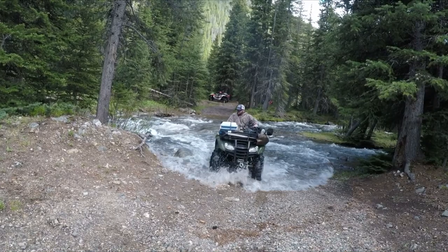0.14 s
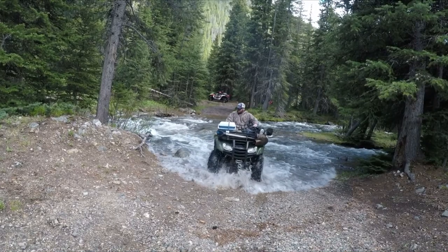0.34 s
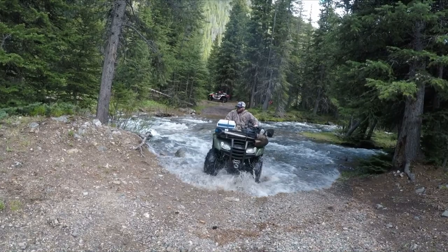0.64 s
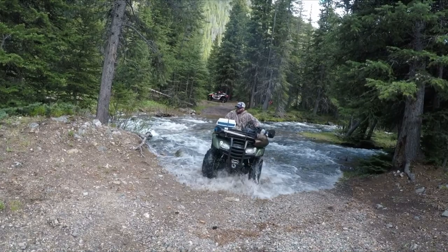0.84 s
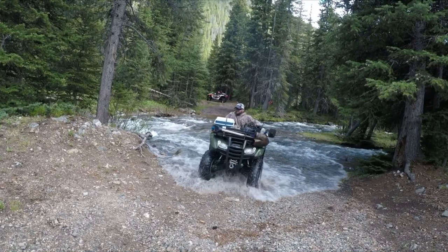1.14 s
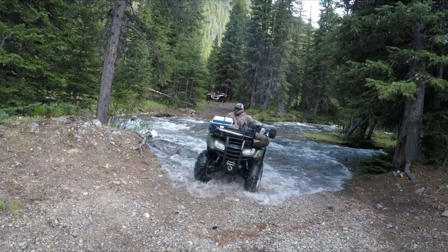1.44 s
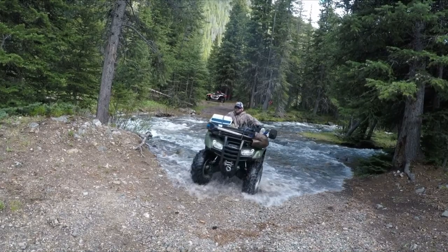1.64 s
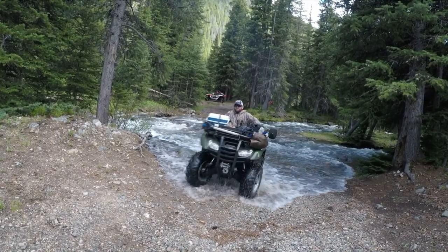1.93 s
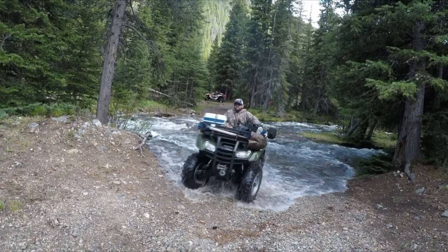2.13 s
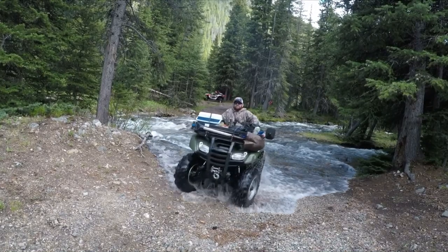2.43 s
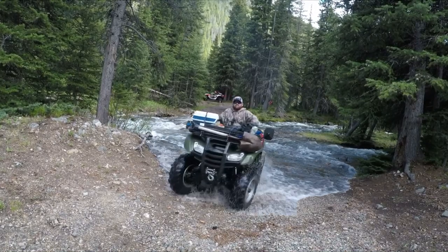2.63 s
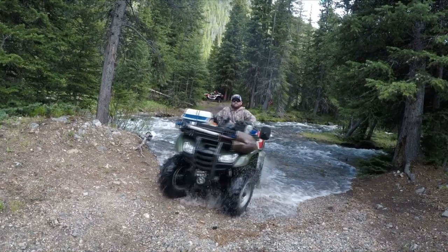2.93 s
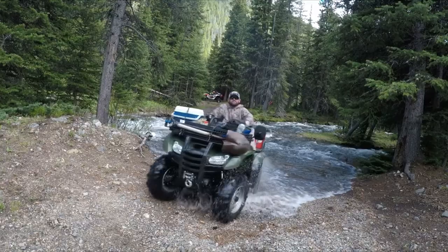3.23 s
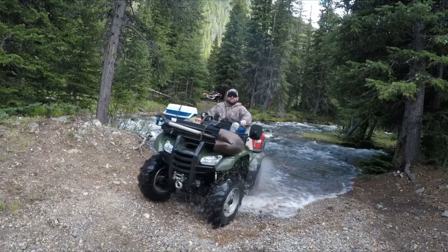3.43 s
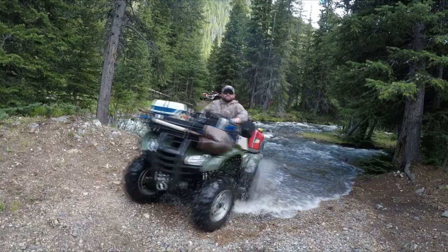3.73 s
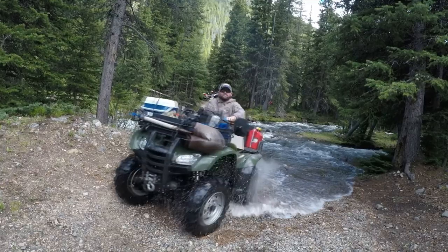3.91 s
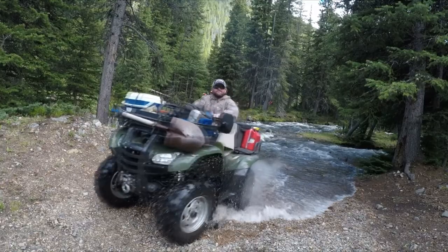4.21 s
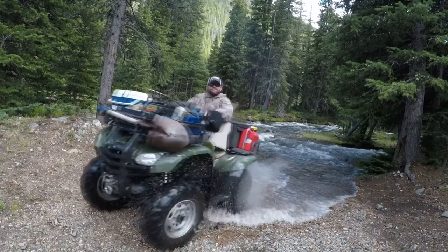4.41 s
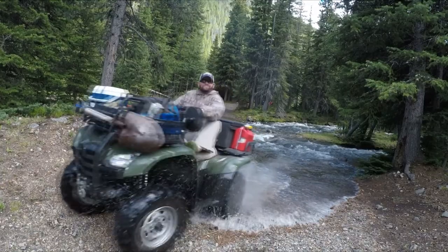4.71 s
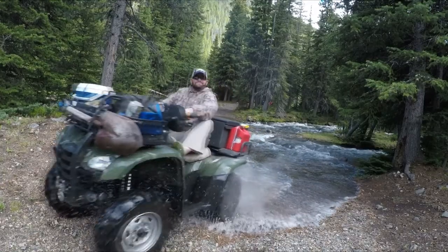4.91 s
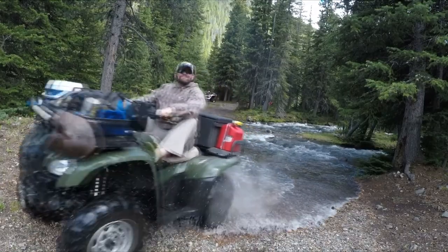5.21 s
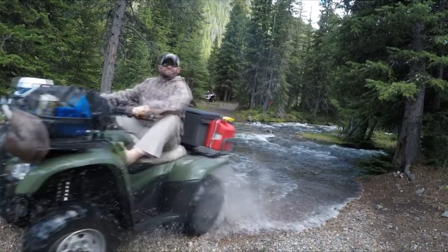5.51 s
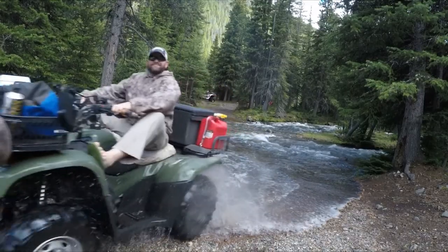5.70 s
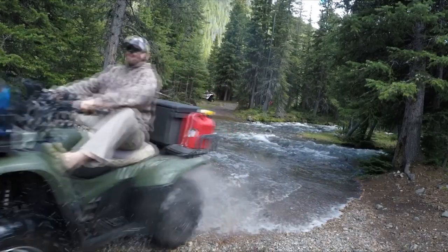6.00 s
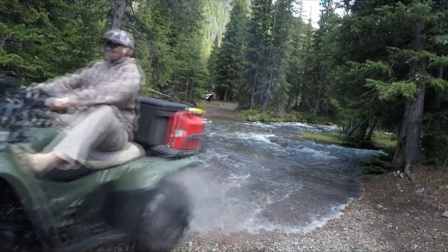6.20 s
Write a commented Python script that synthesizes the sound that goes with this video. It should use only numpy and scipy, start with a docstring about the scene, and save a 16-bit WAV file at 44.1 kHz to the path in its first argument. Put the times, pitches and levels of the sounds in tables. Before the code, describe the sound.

A creek rushes outdoors with a muffled roar and small ringing drops, while a slowed quad bike engine beats in deep, even thumps. Plops, swells of sloshing water and faint pebble clicks come and go as it climbs the bank toward the microphone. In the last seconds the engine's pulsing clatter gets louder and one firing cracks sharply as it passes close. A thin glassy fizz and light ticks run throughout.

```python
"""A single-cylinder quad bike crawls out of a rushing creek and passes close by, at quarter speed.
Its engine throbs deeply, with one falling thump per firing and a clatter that grows as it nears.
The creek is a dull roar with ringing drops; the wheels slosh, splash and click stones together.
The slow-motion playback adds a faint glassy fizz and fine ticks."""
import sys
import numpy as np
from scipy import signal
from scipy.fft import rfft, irfft
from scipy.io import wavfile
from scipy.ndimage import map_coordinates

SR = 44100
rng = np.random.default_rng(int(sys.argv[2]) if len(sys.argv) > 2 else 0)


def waveform_to_disk(signal):
    """Save audio, clipped to [-1, 1], as 16-bit WAV at the path in sys.argv[1]."""
    frames = np.transpose(np.atleast_2d(signal))
    scaled = np.clip(frames, -1, 1) * 32767
    samples = np.round(scaled).astype(np.int16)
    wavfile.write(sys.argv[1], SR, samples)


N = 280035
TIME_S = np.arange(N) / SR


def from_db(db):
    """Turn decibels into a number to multiply by."""
    return 10 ** (np.asarray(db) / 20)


def rms_one(x):
    """Scale a signal so its average level (rms) is 1."""
    return x / np.sqrt(np.mean(x ** 2) + 1e-20)


def in_time(rows):
    """Join (time, value) rows into a curve with a value at every sample."""
    return np.interp(TIME_S, *np.transpose(rows))


def at_hz(rows):
    """Join rows into curves over frequency, one per value column."""
    hz, *columns = np.transpose(rows)
    bins = np.maximum(np.arange(N // 2 + 1) * SR / N, 1)
    return [np.interp(np.log(bins), np.log(hz), column) for column in columns]


def ring(clicks, hz, ring_s):
    """Each click starts a tone that fades by 60 dB in ring_s."""
    r, w = from_db(-60 / (ring_s * SR)), 2 * np.pi * hz / SR
    return signal.lfilter([0, np.sin(w)], [1, -2 * r * np.cos(w), r * r], clicks + 1e-18)


def resonance(x, hz, width_hz):
    """Let through a band of sound around one pitch."""
    r, w = np.exp(-np.pi * width_hz / SR), 2 * np.pi * hz / SR
    return signal.lfilter(np.array([1, 0, -1]) * (1 - r * r) / 2, [1, -2 * r * np.cos(w), r * r], x)


def low_pass(x, hz, order=4):
    """Soften everything above hz."""
    return signal.sosfilt(signal.butter(order, hz, fs=SR, output="sos"), x + 1e-18)


def clicks_of(rows):
    """One click per (start_s, level_db) row."""
    clicks = np.zeros(N)
    for start_s, level_db in rows:
        clicks[round(start_s * SR)] = from_db(level_db)
    return clicks


def random_clicks(per_s, size_db):
    """Clicks at random moments, mostly small and a few large."""
    sizes = from_db(size_db * np.minimum(rng.exponential(1, N), 3)) * rng.choice([-1, 1], N)
    return sizes * (rng.random(N) < per_s / SR)


# How noise spreads between the ears: pitch_hz, likeness (1 = same in both), left_minus_right_db
STEREO_SPREAD = [(30, 0.59, 3.5), (90, .45, 3.5), (134, 0.67, 2.5), (224, 0.29, 0), (268, 0.38, -5),
                 (455, 0.57, 0), (1030, 0.92, 0.1), (1270, 0.72, 3.5), (1710, 0.37, 0), (2100, -0.16, -6.5),
                 (3100, 0.19, 0.5)]

def stereo_noise(spectrum):
    """Noise shaped by a spectrum, wide at some pitches and narrow at others."""
    likeness, lean_db = at_hz(STEREO_SPREAD)
    middle, side = rfft(rng.standard_normal((2, N)))
    sign = np.array([[1], [-1]])
    pair = np.sqrt(1 + likeness) * middle + sign * np.sqrt(1 - likeness) * side
    return rms_one(irfft(pair * from_db(at_hz(spectrum)[0] + sign * lean_db / 2), N))


# Crank speed as heard, sagging as the quad tops the bank: time_s, speed_rpm
CRANK_SPEED = [(0, 346.4), (1.35, 354.1), (2.4, 349.2), (2.75, 342.2), (4, 359.2), (4.65, 342.9),
               (5.5, 331.5), (6.35, 354.0)]

def engine_cycle(start_cycle=0.268):
    """Count the engine's cycles so far; a four-stroke takes two crank turns for each."""
    turns = np.cumsum(in_time(CRANK_SPEED)) / (60 * SR)
    return start_cycle + turns / 2


# The exhaust's tones: multiple (of the firing rate), level_db
EXHAUST_TONES = [(2, -32.5), (3, -54), (4, -10), (5, -41), (6, -51), (7, -42.5), (8, -26.5), (10, -37.5),
                 (11, -40), (12, -36), (14, -46), (16, -37)]

def throb(cycle, dip_cycle=0.2203, right_lead_s=0.0025):
    """The exhaust's tones line up in one sharp pressure dip soon after each firing."""
    phase = 2 * np.pi * (cycle - dip_cycle)
    wave = -sum(from_db(db) * np.cos(multiple * phase) for multiple, db in EXHAUST_TONES)
    return np.array([wave, np.interp(TIME_S + right_lead_s, TIME_S, wave)])


# Tone colour of the exhaust gas: pitch_hz, relative_db
GAS_SPECTRUM = [(15, -11), (28, -6), (36, 7.5), (44, 3), (52, -11.5), (62, -4.5), (90, -8), (125, -15),
                (200, -22), (400, -77)]

def rumble(cycle, level_db=-28.0, swing_db=2.0, peak_cycle=0.084):
    """Swirling exhaust gas surges once per crank turn."""
    surge_db = swing_db * np.cos(4 * np.pi * (cycle - peak_cycle))
    return from_db(level_db + surge_db) * stereo_noise(GAS_SPECTRUM)


# Where the engine casing rings: pitch_hz, width_hz, relative_db
CASING_RINGS = [(345, 150, -6.5), (500.4, 56, 5), (790, 400, -5.5), (967, 44, 6), (1163, 100, -4.5),
                (3260, 900, -14.5)]
# The clatter as the quad comes closer: time_s, level_db
CLATTER_LEVEL = [(0, -58), (2, -50), (3.4, -56.5), (4.75, -45.5), (5.6, -39), (6.1, -35), (6.35, -36.5)]

def clatter(cycle, lead_turns=0.2, rise_turns=0.097, fade_turns=0.24, top_hz=1600):
    """Once per crank turn a burst of rattling shakes the engine casing."""
    turn = (2 * cycle + lead_turns) % 1
    rise = 1 - np.exp(-(turn / rise_turns) ** 2)
    burst = rms_one(rise * np.exp(-turn / fade_turns) + 0.0092)
    shake = burst * stereo_noise([(100, 0.0045), (3000, 0.014)])   # almost white noise
    casing = sum((-1) ** k * from_db(db) * resonance(shake, hz, width_hz)
                 for k, (hz, width_hz, db) in enumerate(CASING_RINGS))
    return from_db(in_time(CLATTER_LEVEL)) * rms_one(low_pass(casing, top_hz))


# Tone colours of the water's low churn and brighter rush: pitch_hz, relative_db
CHURN_SPECTRUM = [(70, -1), (130, -3.5), (200, -1), (270, -2), (350, -0.5), (470, -1.5), (600, -8.5),
                  (800, -14.5), (1400, -73.5)]
RUSH_SPECTRUM = [(350, -19.5), (600, -4), (780, -2.5), (1000, 1.5), (1200, -3.5), (1500, -10),
                 (1900, -17.5), (2050, -24), (2400, -26), (2780, -34), (3050, -27.5), (3300, -30.5),
                 (3500, -44.5), (5500, -60.5)]
# Water stirred up as the front and then the rear wheels climb out: time_s, relative_db
WATER_LEVEL = [(0.0, -35.5), (1.22, -35), (1.68, -35.5), (2.35, -34), (3.16, -36), (4.79, -33),
               (5.91, -36.5), (6.35, -36)]

def creek(churn_db=-1, rush_db=-3):
    """White water: a wide, low churn under a narrower, brighter rush with drops in it."""
    churn = from_db(churn_db) * stereo_noise(CHURN_SPECTRUM)
    rush = from_db(rush_db) * (stereo_noise(RUSH_SPECTRUM) + droplets())
    return from_db(in_time(WATER_LEVEL)) * (churn + rush)


def droplets(per_s=110, ring_cycles=30, level_db=-9, low_hz=840, high_hz=1200, pitch_count=12):
    """Spray falls back at random; each drop rings a small bubble."""
    drops = random_clicks(per_s, size_db=3.5)
    pitch_choice = rng.integers(0, pitch_count, N)
    bubbles = sum(ring(drops * (pitch_choice == k), hz, ring_cycles / hz)
                  for k, hz in enumerate(np.geomspace(low_hz, high_hz, pitch_count)))
    return from_db(level_db) * rms_one(low_pass(bubbles, hz=1400))


# Swells of water around the wheels: peak_s, relative_db
WHEEL_SLOSHES = [(1.05, -41), (2.29, -32), (2.67, -34.5), (3.6, -43), (4.4, -42.5), (4.72, -31),
                 (4.96, -37.5), (5.43, -42), (6.3, -40.5)]

def slosh(pitch_hz=160, width_hz=80, rise_s=0.06, fall_s=0.066, lapping_db=-50, gain_db=-0.5):
    """The wheels dig hollows; water sloshes back in, then settles to a steady lapping."""
    water = resonance(stereo_noise(CHURN_SPECTRUM), pitch_hz, width_hz)
    water = rms_one(resonance(water, pitch_hz, width_hz))   # a second pass narrows the band
    swells = np.zeros(N)
    for peak_s, db in WHEEL_SLOSHES:
        length_s = np.where(TIME_S < peak_s, rise_s, fall_s)
        swells += from_db(db) * np.exp(-((TIME_S - peak_s) / length_s) ** 2)
    return from_db(gain_db) * (from_db(lapping_db) + swells) * water


# The loudest stones snapping under the tyres: start_s, relative_db
STONE_SNAPS = [(.875, -48), (1.089, -45), (1.138, -48), (4.042, -47.5), (4.524, -45), (5.249, -44)]

def stones(pitch_hz=3000, ring_s=0.004, gain_db=5, gravel_db=-62):
    """Pebbles click together with a very short ring; finer gravel ticks in between."""
    gravel = from_db(gravel_db) * random_clicks(per_s=9, size_db=4.5)
    pebbles = ring(clicks_of(STONE_SNAPS) + gravel, pitch_hz, ring_s)
    return from_db(gain_db) * low_pass(pebbles, hz=5100)


# How hard the engine works, most on the bank and least at the top: time_s, relative_db
ENGINE_LOAD = [(0, -10), (1.6, -1), (2.1, 4.5), (4.0, 3.5), (5.1, 6), (5.4, -12), (6.35, -14)]

def firings(cycle, kick_db=-1.5, kick_scatter_db=1.4, boom_scatter_db=0.5):
    """The engine fires once per cycle, a bit unevenly, giving clicks that start thumps and booms."""
    fired = np.diff(np.floor(cycle), prepend=0) > 0
    luck_per_cycle = np.clip(rng.standard_normal((int(cycle[-1]) + 1, 2)), -2, 2)
    kick_luck, boom_luck = luck_per_cycle[cycle.astype(int)].T
    kicks = fired * from_db(kick_db + kick_scatter_db * kick_luck)
    booms = fired * from_db(in_time(ENGINE_LOAD) - boom_scatter_db * boom_luck)
    return kicks, booms


# Where the quad's body rings: pitch_hz, relative_db, ring_s, left_gain, right_gain
BODY_RINGS = [(98, -31.5, 0.15, 1, 1), (173, -36, 0.14, 0.93, 1), (289, -20, 0.055, -1.12, 1),
              (378, -27, 0.049, 0.87, 0.55), (509, -30.5, 0.064, 0.78, 0.66)]
# One engine firing that cracks much louder than the rest: start_s, relative_db
HARD_FIRINGS = [(5.418, 2.5)]

def thumps(kicks, start_hz=430, end_hz=43, fall_s=0.01333, rise_s=0.024, fade_s=0.026,
           sweep_db=-16, crack_db=3, right_db=-10):
    """Each firing cracks, rings the body and falls in pitch as the lows arrive last."""
    all_kicks = kicks + clicks_of(HARD_FIRINGS)
    age_s = np.arange(SR // 3) / SR
    pitch_hz = end_hz + (start_hz - end_hz) * np.exp(-age_s / fall_s)
    swell = (1 - np.exp(-age_s / rise_s)) * np.exp(-age_s / fade_s)
    sweep = np.sin(2 * np.pi * np.cumsum(pitch_hz) / SR) * swell
    crack = from_db(crack_db) * low_pass(all_kicks, hz=900)
    thump = crack + from_db(sweep_db) * signal.fftconvolve(all_kicks, sweep)[:N]
    body = sum(ring(all_kicks, hz, ring_s) * from_db(db) * np.array([[left], [right]])
               for hz, db, ring_s, left, right in BODY_RINGS)
    return np.array([thump, thump * from_db(right_db)]) + low_pass(body, hz=1100)


def muffler(booms, pitch_hz=39, peak_s=0.03, length_s=0.014, gain_db=-25):
    """The air in the muffler swells into a short, deep boom after each firing."""
    age_s = np.arange(SR // 4) / SR
    swell = np.exp(-((age_s - peak_s) / length_s) ** 2) * (1 - np.exp(-age_s / 0.005))
    boom = -np.cos(2 * np.pi * pitch_hz * age_s) * swell
    return from_db(gain_db) * signal.fftconvolve(booms, boom)[:N]


# The loudest splashes at the wheels: start_s, level_db, pitch_hz
WHEEL_SPLASHES = [(1.026, -21.5, 960), (1.529, -27, 790), (2.072, -21.5, 1030), (2.55, -19.5, 1030),
                  (4.018, -27, 710), (4.120, -20, 960), (4.735, -20.5, 900)]

def splashes(ring_cycles=12):
    """The tyres trap pockets of air, which ring briefly."""
    plops = sum(ring(clicks_of([(start_s, db)]), hz, ring_cycles / hz)
                for start_s, db, hz in WHEEL_SPLASHES)
    return low_pass(plops, hz=2100)


def scene():
    """The crank speed paces the engine; water and stones sound around it."""
    cycle = engine_cycle()
    kicks, booms = firings(cycle)
    engine = throb(cycle) + rumble(cycle) + clatter(cycle) + thumps(kicks) + muffler(booms)
    return engine + slosh() + creek() + stones() + splashes()


SLOW_RATE_HZ, BLOCK_SAMPLES = 12000, 256

def slow_playback(x, stalls, seam_s=0.0026):
    """Sparse samples joined by straight lines fizz; a tiny stall between blocks of them ticks."""
    place = (TIME_S - seam_s) * SLOW_RATE_HZ + BLOCK_SAMPLES
    step = place.astype(int)
    sparse_s = (np.arange(step[-1] + 2) - BLOCK_SAMPLES) / SLOW_RATE_HZ + seam_s
    sparse = map_coordinates(x, [sparse_s * SR], order=3, mode="nearest")
    at_seam = step % BLOCK_SAMPLES == 0
    glide = (place - step) * (1 - stalls[step // BLOCK_SAMPLES] * at_seam)
    return sparse[step] + glide * np.diff(sparse)[step]


# The loudest playback ticks: start_s, relative_db
PLAYBACK_TICKS = [(.152, -33), (2.5413, -26.5), (2.8612, -35), (4.0773, -30), (4.5892, -31), (5.4213, -21),
                  (6.2746, -35)]

def record(dry, stall_share=0.51, stall_scatter_db=3.5, tick_left_db=-3, top_hz=15800):
    """Add the fizz and uneven ticks of slow playback, then cut the highest treble."""
    stall_luck = np.clip(rng.standard_normal(N // BLOCK_SAMPLES), -2, 2)
    stalls = stall_share * from_db(stall_scatter_db * stall_luck)
    fizzy = np.array([slow_playback(channel, stalls) for channel in dry])
    ticks = low_pass(clicks_of(PLAYBACK_TICKS), hz=7000, order=2)
    balance = np.array([[from_db(tick_left_db)], [1]])
    treble_cut = signal.ellip(10, 0.1, 80, top_hz, fs=SR, output="sos")
    return signal.sosfilt(treble_cut, fizzy + ticks * balance)


dry = scene()
out = record(dry)
waveform_to_disk(out)
```